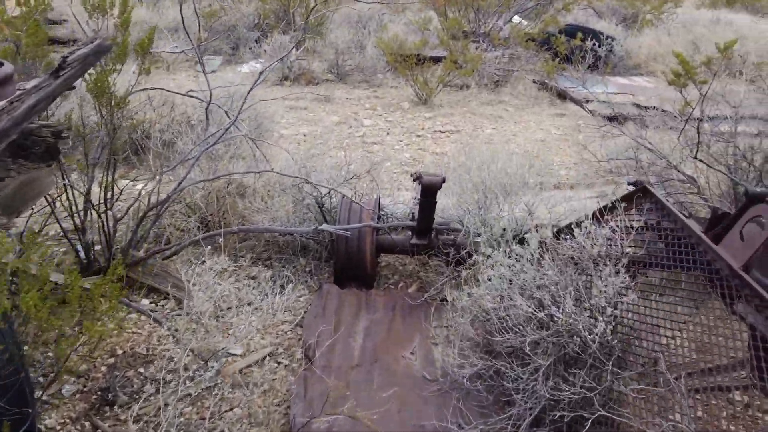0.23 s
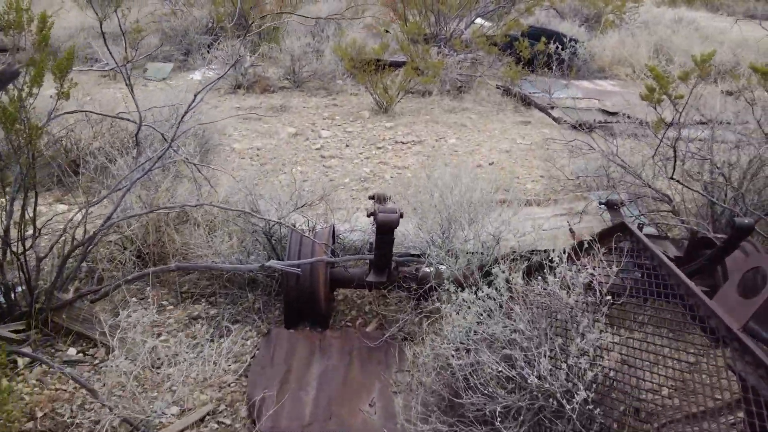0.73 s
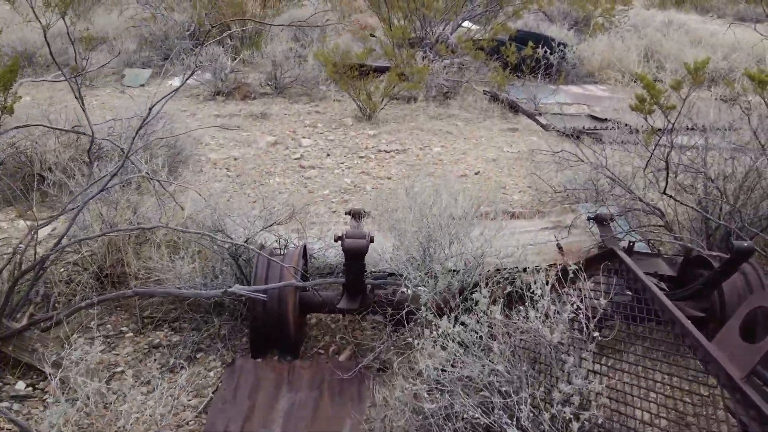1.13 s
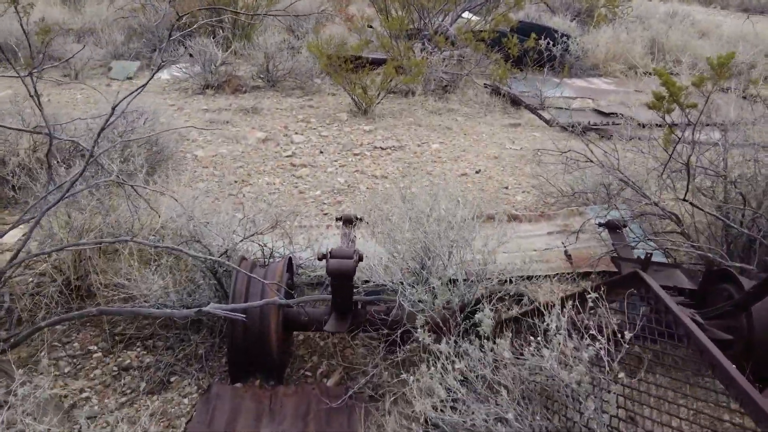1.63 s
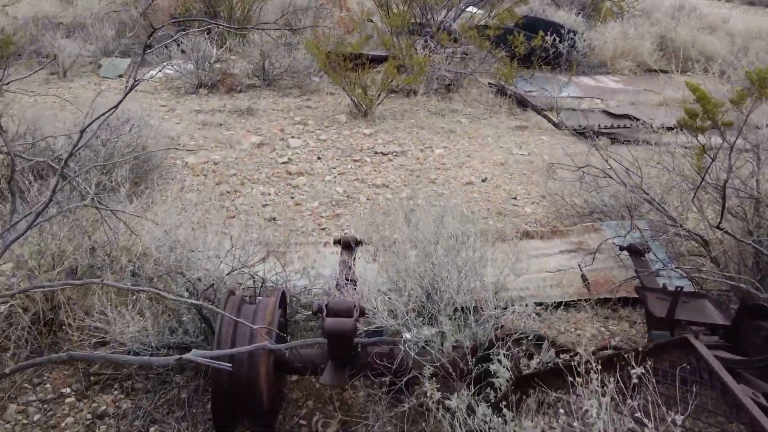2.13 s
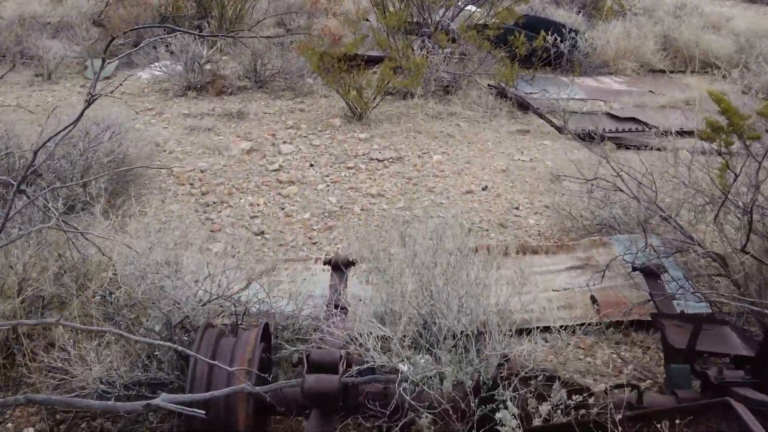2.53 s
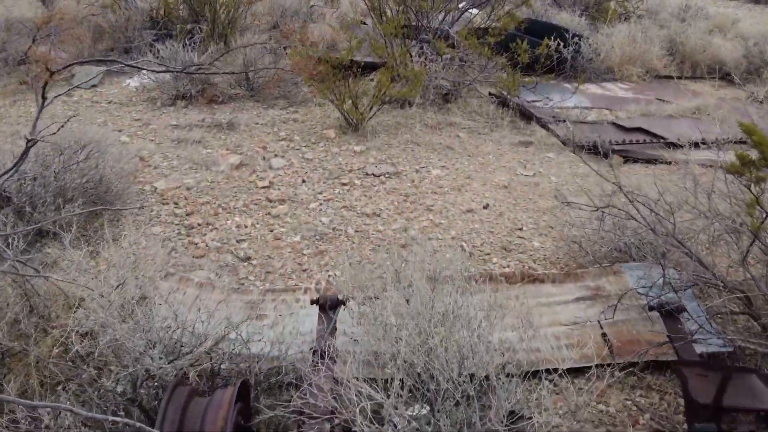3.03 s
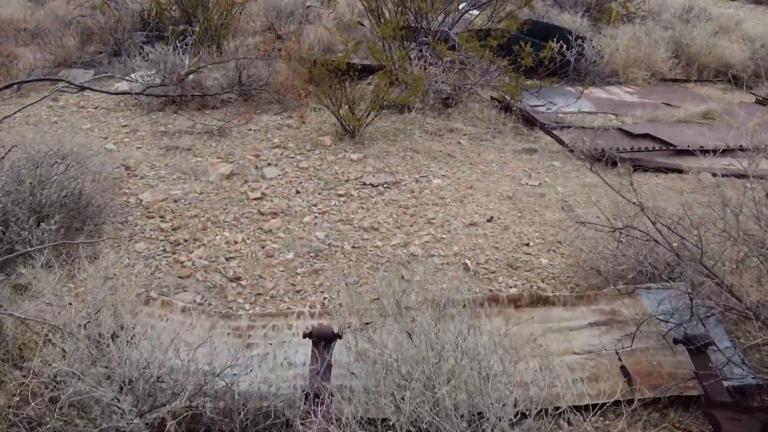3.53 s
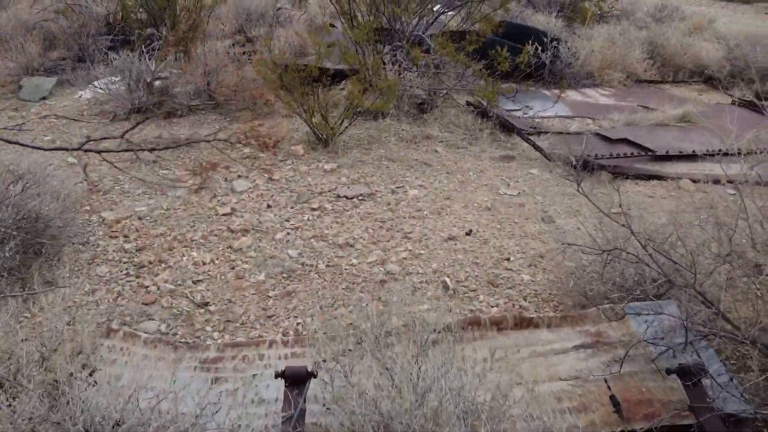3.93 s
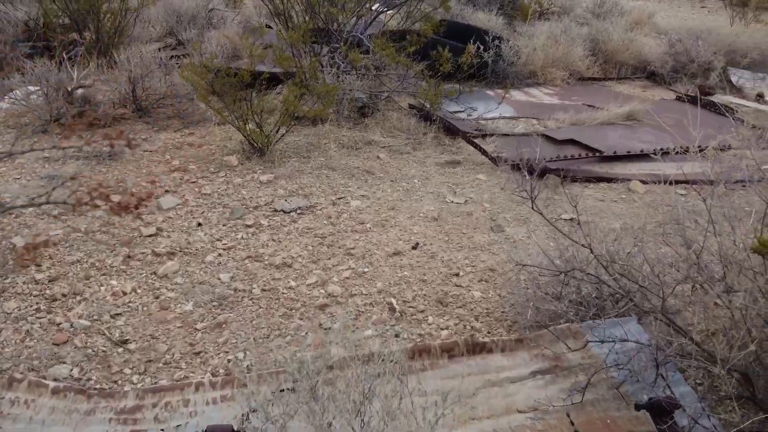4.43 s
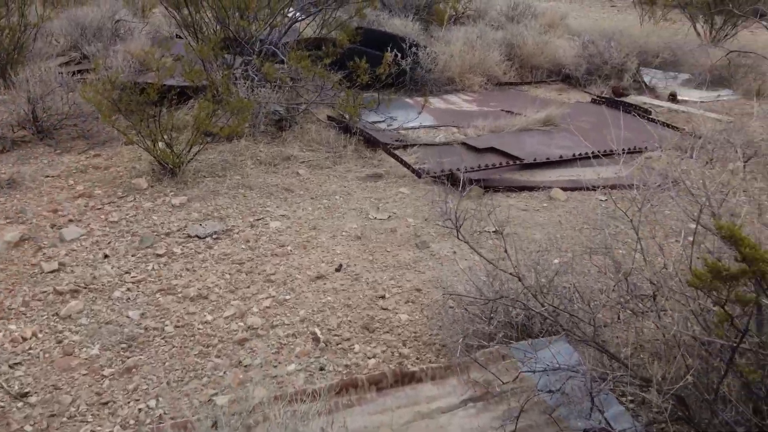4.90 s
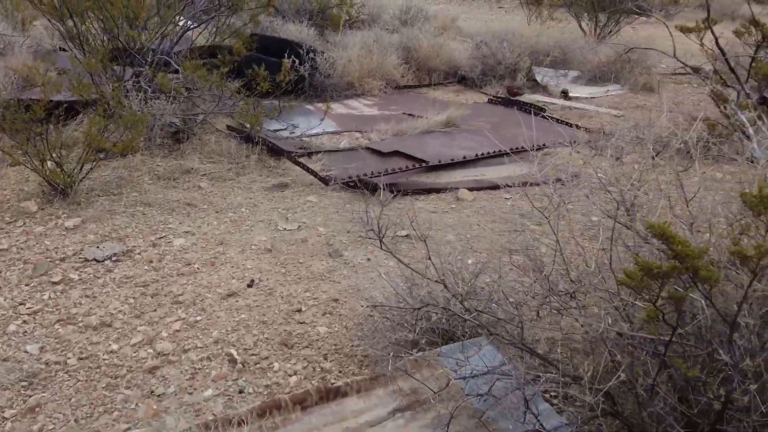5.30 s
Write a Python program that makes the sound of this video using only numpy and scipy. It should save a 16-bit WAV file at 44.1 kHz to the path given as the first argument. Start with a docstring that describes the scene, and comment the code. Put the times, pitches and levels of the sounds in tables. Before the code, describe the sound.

Close, dry footsteps on gravel and brittle brush, heard from a hand-held camera above the feet. Soles grind and slide, stones knock dully, pebbles clink and grit snaps sharply. Soft shuffling opens, a solid thud lands before three seconds, a short lull follows, then louder, denser crunches continue to the end. Outdoors without reverberation, above a weak, steady, distant engine rumble.

```python
"""A parked engine idles some way off; boots then walk slowly over dry gravel and brush, below a hand-held camera.
The idle is a sum of harmonic engine orders over low noise. Soles grind: shaped noise follows a power curve.
Stones knock as short swings and settle; pebbles clink as decaying modes; dry stones click without a ring.
Grit and twigs snap and slide: noise bursts and short ringing grains. The camera body's resonances colour all."""
import sys
import numpy as np
from scipy import signal
from scipy.fft import rfft, irfft, next_fast_len
from scipy.io import wavfile
from scipy.ndimage import uniform_filter1d, map_coordinates

SR = 44100
rng = np.random.default_rng(int(sys.argv[2]) if len(sys.argv) > 2 else 0)


def store_pcm(level_fs):
    """Save levels as 16-bit WAV."""
    pcm = np.round(np.clip(level_fs, -1, 1) * 32767).astype(np.int16)
    wavfile.write(sys.argv[1], SR, np.atleast_2d(pcm).T)


N = 245195  # length in samples

# All levels are source levels, ahead of the mixing gains and the camera body.
IDLE_HZ = 25.51
# Harmonics of the idling engine. Each row: multiple of the idle rate, level in dB.
ENGINE_ORDERS = [(2, -54), (3, -61.5), (4, -56), (5, -59.5)]
# Spectrum of the engine's rumble. Each row: frequency in Hz, relative density in dB per Hz.
RUMBLE_COLOUR = [(20, 10), (40, 3), (70, 8.5), (110, 9), (160, 2), (400, -42)]

# Grinding of the soles between blows. Each row: time in seconds, level of the stones in dB, level of the grit in dB.
SOLE_GRINDING = [(0.0, -73, -69), (0.18, -44, -66), (0.32, -40.5, -50), (0.43, -38.5, -51),
                 (0.71, -55.5, -61), (1.19, -51, -58), (1.66, -57.5, -57), (1.87, -51.5, -58),
                 (2.06, -45, -47.5), (2.42, -64, -65), (2.63, -35, -62), (2.82, -47, -63),
                 (2.95, -56, -69.5), (3.11, -61.5, -62.5), (3.34, -41.5, -54), (3.48, -36.5, -48),
                 (3.67, -43.5, -50), (3.87, -50.5, -66.5), (4.1, -55, -60), (4.46, -42, -54.5),
                 (4.65, -35, -47.5), (4.85, -56, -59), (5.13, -62.5, -63.5), (5.28, -48, -58.5),
                 (5.56, -44, -54.5)]
# Pebbles lie between stones and grit; dust follows the grit.
PEBBLES_SHARE, PEBBLES_DB, DUST_DB = 0.3, 1, -6

# Pebbles that ring out of the crunch. Each row: start in seconds, level in dB, pitch in Hz, t60 in seconds.
PEBBLE_CLINKS = [(0.039, -49, 1480, 0.049), (1.07, -41, 1010, 0.058), (1.132, -38, 1480, .04),
                 (1.172, -34, 686, 0.058), (1.218, -33.5, 1740, 0.032), (1.451, -34, 1950, 0.028),
                 (1.548, -35, 1500, 0.023), (1.561, -34, 1570, 0.025), (1.933, -38, 1540, 0.036),
                 (1.967, -36, 2270, 0.069), (2.429, -41.5, 1590, 0.027), (2.5, -37.5, 995, 0.054),
                 (2.582, -40, 4230, 0.07), (2.581, -36, 3650, 0.14), (2.655, -35, 1305, 0.2),
                 (2.616, -42.5, 3700, 0.094), (2.588, -33.5, 1058, 0.093), (3.252, -43, 1620, 0.025),
                 (3.355, -33, 1044, 0.45), (3.417, -25, 908, 0.058), (3.528, -38, 4200, 0.043),
                 (3.771, -32.5, 4230, 0.058), (4.227, -29.5, 755, 0.13), (4.229, -35.5, 6160, 0.13),
                 (4.243, -27.5, 756, 0.11), (4.226, -33.5, 2550, 0.2), (4.238, -37, 1390, 0.1),
                 (4.245, -35.5, 4080, 0.16), (4.55, -23.5, 824, 0.022), (4.625, -22.5, 921, 0.14),
                 (4.633, -22, 1148, 0.095), (4.927, -46, 1776, 0.1), (5.184, -40, 2767, 0.17),
                 (5.335, -31, 1340, 0.092), (5.351, -37, 1250, 0.08)]
# Other modes of a pebble. Each row: multiple of its pitch, level in dB relative to the main mode.
PEBBLE_PARTNERS = [(.66, -19), (1.22, -8.5)]
PARTNER_LIFE = 0.13  # t60 of a partner, as a share of the main mode's

# Soles sliding over grit. Each row: start in seconds, level in dB, coarseness in dB, time to swell in seconds.
SOLE_SLIDES = [(.128, -50.5, 0.5, 0.019), (.96, -47.5, 2.5, 0.029), (1.638, -41, 3, 0.009),
               (1.969, -42, -3, 0.015), (2.584, -46.5, 7.5, 0.012), (2.979, -60.5, 9.5, 0.012),
               (3.168, -53.5, 3.5, 0.014), (3.39, -48, 14, 0.012), (3.445, -39, -6, 0.0074),
               (3.625, -37, 3, 0.011), (3.715, -38.5, 1.5, 0.01), (4.216, -32, 0.5, 0.02),
               (4.263, -37.5, -1.5, 0.0099), (4.63, -49, 12.5, 0.025), (5.075, -52.5, 4.5, 0.022),
               (5.139, -47.5, 6.5, 0.021), (5.334, -48, 5.5, 0.014)]
# Sharp snaps of grit and twigs. Each row: start in seconds, level in dB, coarseness in dB, nominal t60 in seconds.
GRIT_SNAPS = [(0.176, -36.5, 2, 0.55), (0.203, -39.5, 6, 0.95), (0.36, -28.5, 3.5, 0.16),
              (0.382, -40.5, 11, 0.2), (.4584, -34.5, -12, 0.059), (.51, -39, 3.5, 0.42),
              (0.5638, -33, -4, 0.25), (0.6866, -38, -4.5, 0.13), (.7612, -44, -17, 0.063),
              (0.945, -32.5, -9, 0.13), (1.045, -37, -10, 0.075), (1.129, -41, -0.5, 0.38),
              (1.2114, -32, -5, 0.17), (1.331, -42.5, -4.5, 0.22), (1.452, -35.5, 2.5, 0.061),
              (1.468, -37, -13, 0.13), (1.547, -37.5, -33, 0.088), (1.559, -33, -9, 0.07),
              (1.632, -30, -1, 0.25), (1.708, -36.5, -5, 0.15), (1.7354, -25.5, -15, 0.023),
              (1.859, -41, -8, 0.22), (1.88, -33.5, -4.5, 0.062), (1.932, -42.5, -25, 0.3),
              (1.9667, -31, -10, 0.074), (1.996, -24, -1, 0.089), (2.2183, -41.5, 0, 0.21),
              (2.479, -45.5, 5.5, 0.58), (2.582, -31, -12, 0.078), (2.653, -60, 19.5, 0.18),
              (3.058, -51, -29, 0.076), (3.133, -44, -2, 0.07), (3.2988, -51, 18, 0.36),
              (3.331, -35.5, -7, 0.21), (3.354, -28, 0, 0.32), (3.377, -24, 3, 0.068),
              (3.412, -42, 21.5, 0.13), (3.453, -20, -0.5, 0.12), (3.53, -32.5, -0.5, 0.3),
              (3.5784, -15, -7, 0.098), (3.7117, -29.5, -6, .08), (3.736, -26.5, -1.5, 0.11),
              (3.768, -18, 0, 0.13), (3.855, -35.5, 0.5, 0.12), (4.069, -41.5, 7.5, 0.14),
              (4.333, -34, -16, 0.11), (4.398, -35.5, -3, .21), (4.418, -24.5, -1, 0.11),
              (4.549, -26, 2.5, 0.086), (4.589, -25, -28, 0.074), (4.6256, -30.5, 11.5, 0.07),
              (4.927, -34, -23, 0.13), (5.169, -22, 6.5, 0.096), (5.184, -27.5, 2.5, 0.15),
              (5.325, -36, 3, 0.11), (5.445, -26.5, -6.5, 0.097), (5.501, -30, -4.5, 0.066)]
# Dust under the grit, in dB; each dB of coarseness adds 1 dB of pebbles and takes DUST_LOSS dB of dust.
SNAP_DUST_DB, SLIDE_DUST_DB, DUST_LOSS = -14, -5.5, 0.38

# Stones knocked by heel and toe. Each row: start in seconds, envelope peak in dB, pitch in Hz, settling t60 in seconds.
STONE_KNOCKS = [(0.145, -44, 240, 0.46), (0.208, -29, 500, 0.72), (0.247, -31, 437, .15),
                (.668, -37.5, 400, 0.2), (.949, -31, 269, 0.44), (.975, -29, 303, 0.24),
                (1.012, -31, 344, 0.073), (1.132, -34.5, 452, 0.24), (1.168, -39, 326, 0.24),
                (1.24, -41.5, 380, 0.062), (1.707, -21, 340, 0.34), (1.707, -26.5, 163, .1),
                (1.816, -30.5, 316, 0.099), (1.88, -31, 575, 0.14), (1.997, -24, 513, 0.23),
                (2.027, -35, 387, 0.12), (2.317, -35.5, 368, 0.16), (2.441, -33, 285, 0.17),
                (2.477, -30, 350, 0.58), (2.568, -33, 296, 0.22), (2.652, -13, 598, 0.26),
                (2.6483, -19.5, 226, .1), (2.665, -23.5, 620, 0.16), (2.666, -29, 298, .1),
                (2.692, -27, 300, .12), (2.715, -31, 376, .1), (2.734, -36, 325, 0.16),
                (3.002, -39, 243, 0.38), (3.3, -35.5, 460, 0.25), (3.333, -30, 368, 0.2),
                (3.373, -23.5, 450, 0.076), (3.3831, -19, 415, 0.33), (3.401, -24, 424, .1),
                (3.41, -15, 640, 0.21), (3.475, -22.5, 414, 0.068), (3.579, -27, 386, 0.13),
                (3.767, -28.5, 292, 0.48), (4.068, -26.5, 480, 0.24), (4.235, -30, 420, 0.45),
                (4.417, -31.5, 310, 0.13), (4.5, -35.5, 360, 0.93), (4.541, -27, 376, 0.086),
                (4.523, -30, 420, 0.13), (4.6273, -11.5, 420, 0.18), (4.6318, -14, 343, 0.49),
                (4.651, -24, 420, 0.092), (4.667, -40, 328, .1), (5.075, -37, 364, 1),
                (5.167, -17, 287, 0.26), (5.169, -18, 149, 0.13), (5.182, -25, 358, 0.15),
                (5.208, -27, 334, 0.09), (5.226, -36, 350, 0.073), (5.244, -32, 330, .1),
                (5.327, -28, 493, 0.12), (5.3345, -22.5, 340, 0.1), (5.351, -29.5, 378, 0.075)]
# A blow of SETTLE_AT_DB settles at SETTLE_DB; SETTLE_GROWS is dB of settling per dB of blow.
SETTLE_AT_DB, SETTLE_DB, SETTLE_GROWS = -27.5, -32.5, 0.81
# Cycles that a stone of SWELL_HZ takes to swing up; SWELL_LAW is the power of pitch.
SWELL_CYCLES, SWELL_HZ, SWELL_LAW = 0.88, 350, 0.03

# Dry clicks of stone on stone. Each row: start in seconds, level in dB, pitch in Hz.
STONE_TICKS = [(0.1753, -33, 1200), (0.206, -23.5, 1180), (.26, -30, 900), (0.36, -36, 1500),
               (0.388, -27, 1100), (1.317, -44, 1800), (1.372, -41, 2000), (1.4508, -22, 1920),
               (1.473, -34, 5040), (1.481, -31.5, 2900), (1.548, -36, 2200), (1.5612, -39, 2600),
               (2.581, -32, 3800), (2.8, -46, 3500), (3.022, -46, 2490), (3.251, -49, 2200),
               (3.4113, -16, 900), (3.592, -21.5, 1090), (4.421, -25, 2770), (4.55, -19, 2580),
               (4.552, -28, 5200), (4.591, -24.5, 1100), (5.169, -24, 1500), (5.188, -18, 1120),
               (5.252, -35, 1200)]

# Spectra of the four grain sizes. Each row: frequency in Hz, relative density in dB per Hz.
STONES_COLOUR = [(50, -44), (100, -17.5), (170, -2.5), (260, 3), (400, 3.5), (500, -3.5), (720, -9),
                 (1200, -17.5), (2000, -25), (3200, -48), (6000, -85)]
PEBBLES_COLOUR = [(250, -41), (450, 2), (700, -0.5), (1000, -3.5), (1500, -4), (2200, -12), (3000, -12),
                  (4500, -25), (8000, -89)]
GRIT_COLOUR = [(800, -73), (1500, -40), (2500, -0.5), (3200, -4), (5000, -4), (6300, -4.5), (8000, -9),
               (10500, -25.5), (14000, -73)]
DUST_COLOUR = [(4000, -76), (6000, -8.5), (8500, -5), (11000, -8), (13000, -7), (15800, -5.5)]
# Likeness of left and right in the crunch. Each row: frequency in Hz, correlation from 0 to 1.
LEFT_RIGHT_LIKENESS = [(60, 0.87), (180, 1), (550, 0.62), (1650, 0.74), (4970, 0.059), (15000, 0.062)]

# Resonances of the camera body. Each row: centre in Hz, width in Hz, lift in dB.
BODY_RESONANCES = [(360, 30, 1), (770, 36, 2.5), (2680, 130, 0), (4190, 250, 2), (6180, 260, 3)]
TOP_HZ = 16000  # band limit

OPPOSITE = np.array([[1], [-1]])  # signs of the left and right ports


def amp(db):
    """Decibel law: the amplitude gain of a level in dB."""
    return 10 ** (np.asarray(db) / 20)


def unit(x):
    """Normalisation: scales a signal to rms 1."""
    return x / np.sqrt(np.mean(x ** 2) + 1e-20)


def along(points, hz):
    """Log-frequency interpolation between rows of frequency and value."""
    f, v = np.transpose(points)
    return np.interp(np.log(hz + 1), np.log(f + 1), v)


def wobble(rate):
    """Slow random modulation: a smooth curve through `rate` random knots a second."""
    knots = rng.standard_normal(int(N * rate / SR) + 4)
    return map_coordinates(knots, [np.arange(N) * rate / SR])


def filtered(x, response):
    """Linear filtering: the spectrum is multiplied by a response of frequency."""
    m = next_fast_len(N + 8192)
    return irfft(rfft(x, m) * response(np.fft.rfftfreq(m, 1 / SR)), m)[..., :N]


def engine():
    """Harmonic synthesis: low orders of one unsteady rotation, over low-frequency noise."""
    phase = 2 * np.pi * np.cumsum(IDLE_HZ * (1 + 0.0059 * wobble(2.97))) / SR
    unsteady_db = 1.5
    tones = 0
    for k, db in ENGINE_ORDERS:
        level = np.sqrt(2) * amp(db + unsteady_db * wobble(9.7))  # sqrt(2): the level is an rms
        tones = tones + level * np.sin(k * phase + k * k)
    noise = rng.standard_normal((2, N))
    mid, side = unit(filtered(noise, lambda hz: amp(along(RUMBLE_COLOUR, hz))))
    return tones + amp(-57.0) * (mid + amp(-9.5) * side * OPPOSITE)


def tread():
    """Frictional power: each grain size follows the slow, uneven grinding of the soles."""
    s, *columns = np.transpose(SOLE_GRINDING)
    stones, grit = [np.interp(np.arange(N) / SR, s, column) for column in columns]
    pebbles = PEBBLES_SHARE * stones + (1 - PEBBLES_SHARE) * grit + PEBBLES_DB
    uneven_db = 2.2 * wobble(40)
    levels_db = np.array([stones, pebbles, grit, grit + DUST_DB]) + uneven_db
    return amp(2 * levels_db)  # doubled dB: power, not amplitude


def patchy(depth_db, size):
    """Shifting resonance: bands of two noises come and go, as other stones take the load."""
    z = signal.stft(rng.standard_normal((2, N)), nperseg=size)[2]
    field = rng.standard_normal(z.shape[1:])
    field = uniform_filter1d(field, size=3, axis=0)  # over frequency
    field = uniform_filter1d(field, size=5, axis=1)  # over time
    return signal.istft(z * amp(depth_db * unit(field)), nperseg=size)[1][:, :N]


def crunch(power, colour, rate, lumpy_db, patchy_db, pan_db, size):
    """Superposition of countless small contacts: lumpy, patchy noise of given power and colour."""
    lumps = amp(lumpy_db * (wobble(rate) + 0.51 * wobble(rate / 8)))
    pair = unit(lumps * patchy(patchy_db, size)) * np.sqrt(power)
    hz = np.fft.rfftfreq(8192, 1 / SR)
    norm = np.sqrt(np.mean(amp(2 * along(colour, hz))))

    def mid_side_response(f):
        # Half the angle whose cosine is the correlation sets the mid and side shares.
        turn = np.arccos(np.clip(along(LEFT_RIGHT_LIKENESS, f), -1, 1)) / 2
        return amp(along(colour, f)) / norm * np.array([np.cos(turn), np.sin(turn)])

    mid, side = filtered(pair, mid_side_response)
    return np.array([mid + side, mid - side]) * amp(pan_db / 2 * OPPOSITE)


def grains(power, centre_hz, cycles, level_db, count, size=700):
    """Discrete excitation: scattered pebbles ring a few cycles, as loud as the pressure allows."""
    at, tall, side = rng.random((count, 3)).T
    hz = np.clip(centre_hz * np.exp(0.558 * rng.standard_normal(count)), 200, 9000)[:, None]
    start, t = (at * N).astype(int), np.arange(size)  # in samples
    gain = np.sqrt(power[start]) * amp(level_db - 2.24 * np.log(tall + 0.012))  # a few stand out
    turns = hz * t / SR
    where = (start[:, None] + t).ravel()
    envelope = gain[:, None] * np.exp(-3 * turns / cycles)
    ports = []
    for k in (0, 2):  # the second port hears each grain out of step
        step = k * side * np.minimum(hz[:, 0] / 1000, 1)
        ring = envelope * np.sin(2 * np.pi * turns + step[:, None])
        ports.append(np.bincount(where, ring.ravel(), N + size)[:N])
    return np.array(ports)


def clinks():
    """Modal ringing: a tick, then a lumpy ring with brief partners; shorter rings waver more in pitch."""
    out, t = np.zeros((2, N + SR)), np.arange(SR // 5) / SR
    for s, db, hz, t60 in PEBBLE_CLINKS:
        t60 = max(t60, .008)
        waver = 0.04 / np.sqrt(t60) * np.cumsum(rng.standard_normal(len(t)))
        step = rng.choice([-1, 1]) * .5 * OPPOSITE  # the two ports hear it out of step
        rattle = amp(1.5 * map_coordinates(rng.standard_normal(50), [t * 220]))
        tick = amp(-9 - 60 * t / 0.0019)
        ring = (rattle * amp(-60 * t / t60) + tick) * np.sin(2 * np.pi * hz * t + waver + step)
        for k, weaker_db in PEBBLE_PARTNERS:
            decay = amp(weaker_db - 60 * t / (PARTNER_LIFE * t60))
            ring = ring + decay * np.sin(2 * np.pi * k * hz * t + k * waver + step)
        out[:, round(s * SR):][:, :len(t)] += amp(db) * ring * (1 - np.exp(-t / 0.00021))
    return out[:, :N]


def swells(rows):
    """Sliding friction: the power of each slide (start, dB, swell) is a rounded hump."""
    power, t = np.zeros(N + SR), np.arange(SR // 2) / SR
    for s, db, swell in rows:
        hump = (t / swell * np.exp(1 - t / swell)) ** 1.06
        power[round(s * SR):][:len(t)] += (amp(db) * hump) ** 2
    return power[:N]


def bursts(rows, rise):
    """Impulsive excitation: the power of each blow (start, dB, t60) rises fast and decays exponentially."""
    power, t = np.zeros(N + SR), np.arange(SR // 2) / SR
    for s, db, t60 in rows:
        decay = amp(db - 60 * t / max(t60, .01))
        power[round(s * SR):][:len(t)] += (decay * (1 - np.exp(-t / rise))) ** 2
    return power[:N]


def crackle(pebbles, grit, dust):
    """Granular friction and fracture: slides and snaps add power to the grinding of three grain sizes."""
    s, db, coarse_db, swell = np.transpose(SOLE_SLIDES)
    pebbles = pebbles + swells(zip(s, db + coarse_db, swell))
    grit = grit + swells(zip(s, db, swell))
    dust = dust + swells(zip(s, db + SLIDE_DUST_DB - DUST_LOSS * coarse_db, swell))

    s, db, coarse_db, t60 = np.transpose(GRIT_SNAPS)
    pebbles = pebbles + bursts(zip(s, db + coarse_db - 6.0, 1.34 * t60), rise=0.00015)
    grit = grit + bursts(zip(s, db - 7.0, t60), rise=0.0037)  # the tail
    grit = grit + bursts(zip(s, db - 4.5, t60 / 6), rise=0.00031)  # the sharp onset
    dust_db = db + SNAP_DUST_DB - DUST_LOSS * coarse_db
    dust = dust + bursts(zip(s, dust_db, 0.81 * t60), rise=0.002)

    pebble_noise = crunch(pebbles, PEBBLES_COLOUR, rate=500, lumpy_db=1.0, patchy_db=3.0, pan_db=1.0, size=1024)
    pebble_grains = (grains(pebbles, centre_hz=1205, cycles=17.0, level_db=-10.5, count=1500)
                     + grains(pebbles, centre_hz=1877, cycles=41, level_db=-17.5, count=300)
                     + grains(pebbles, centre_hz=1880, cycles=4.9, level_db=-6, count=1200, size=200))
    grit_noise = crunch(grit, GRIT_COLOUR, rate=480, lumpy_db=1.0, patchy_db=1.5, pan_db=0.5, size=512)
    grit_grains = (grains(grit, centre_hz=5960, cycles=3.7, level_db=-1.5, count=1500, size=100)
                   + grains(grit, centre_hz=4117, cycles=48, level_db=-14.0, count=2500))
    dust_noise = crunch(dust, DUST_COLOUR, rate=1500, lumpy_db=0.0, patchy_db=2.5, pan_db=-1.0, size=256)
    return amp(-1.5) * pebble_noise + pebble_grains + amp(-5.0) * grit_noise + grit_grains + dust_noise


def swing(db, hz, cycles):
    """Heavily damped oscillation: it builds and dies within a few cycles, out of step at the two ports."""
    turns = hz * np.arange(SR // 10) / SR
    step = rng.choice([-1, 1]) * (hz / 850) ** 2 * OPPOSITE
    envelope = amp(db) * turns / cycles * np.exp(1 - turns / cycles)
    return envelope * np.sin(2 * np.pi * turns + step)


def knocks(grinding):
    """Impact and settling: each blow swings a stone; loosened stones settle after it, amid the grinding."""
    blows, settling_rows = np.zeros((2, N + SR)), []
    for s, db, hz, t60 in STONE_KNOCKS:
        cycles = SWELL_CYCLES * (hz / SWELL_HZ) ** SWELL_LAW
        blows[:, round(s * SR):][:, :SR // 10] += swing(db, hz, cycles)
        settling_rows.append((s, SETTLE_DB + SETTLE_GROWS * (db - SETTLE_AT_DB), t60))
    loose = grinding + bursts(settling_rows, rise=0.0024)
    stone_noise = crunch(loose, STONES_COLOUR, rate=270, lumpy_db=1.5, patchy_db=2, pan_db=0.1, size=1024)
    stone_grains = grains(loose, centre_hz=431, cycles=5.1, level_db=-9.0, count=500, size=1500)
    return blows[:, :N] + amp(-2.5) * stone_noise + stone_grains


def ticks():
    """Brief contact without resonance: a cycle or two with a soft start, nearly alike at both ports."""
    out, t = np.zeros((2, N + SR)), np.arange(400) / SR
    for s, db, hz in STONE_TICKS:
        step = 0.28 * rng.standard_normal() * OPPOSITE
        turns = hz * t
        envelope = amp(db) * turns / 0.98 * np.exp(1 - turns / 0.69)
        out[:, round(s * SR):][:, :len(t)] += envelope * np.sin(2 * np.pi * turns + step)
    return out[:, :N]


def scene():
    """Superposition: the idling engine and every sound of the feet add linearly."""
    stones, pebbles, grit, dust = tread()
    return engine() + clinks() + crackle(pebbles, grit, dust) + knocks(stones) + ticks()


def record(dry):
    """Resonant transmission: the camera body colours everything; nothing is kept above the band limit."""
    def body(hz):
        lift_db = sum(db / (1 + (2 * (hz - centre) / width) ** 2) for centre, width, db in BODY_RESONANCES)
        return amp(lift_db) * (hz < TOP_HZ)

    return filtered(dry, body)


dry = scene()
out = record(dry)
store_pcm(out)
```